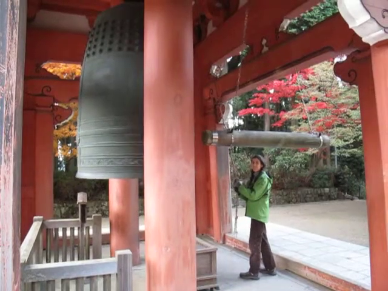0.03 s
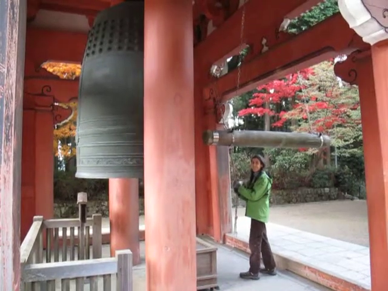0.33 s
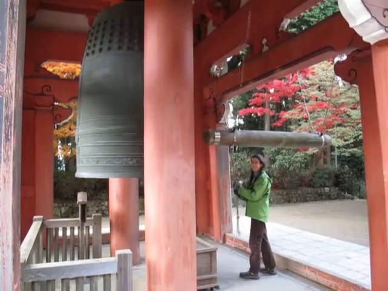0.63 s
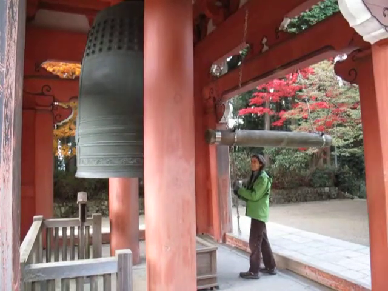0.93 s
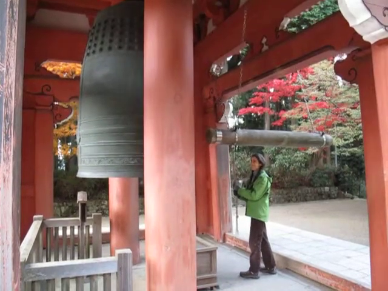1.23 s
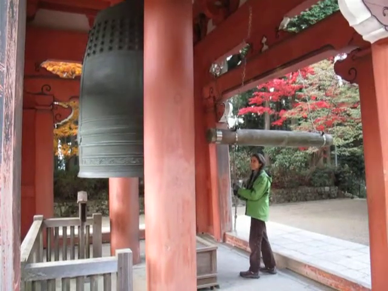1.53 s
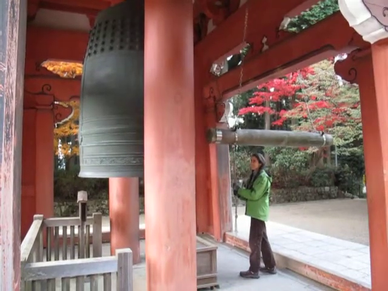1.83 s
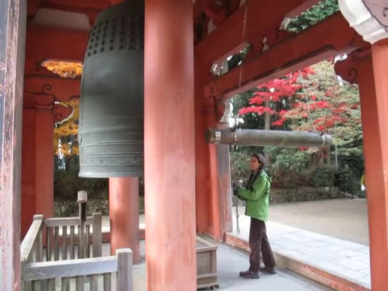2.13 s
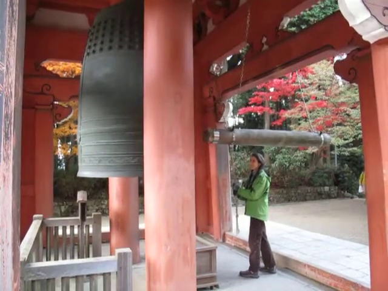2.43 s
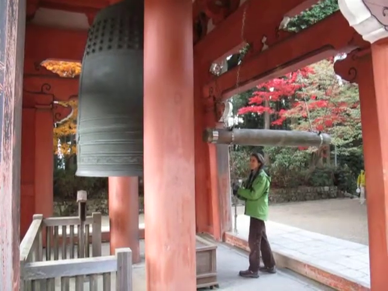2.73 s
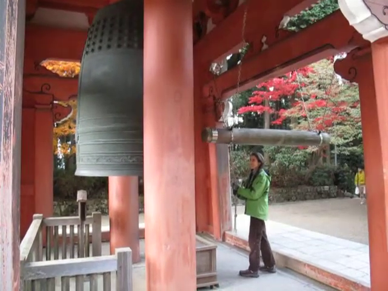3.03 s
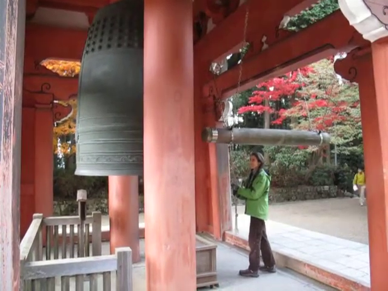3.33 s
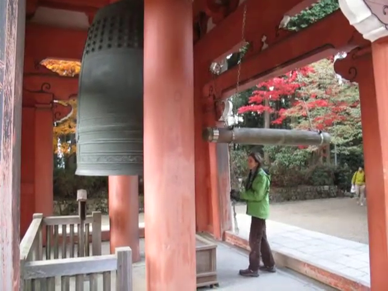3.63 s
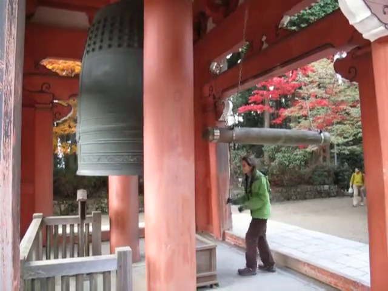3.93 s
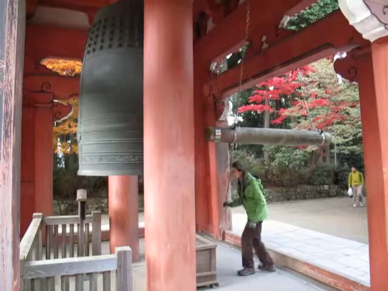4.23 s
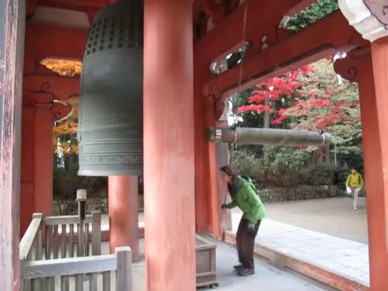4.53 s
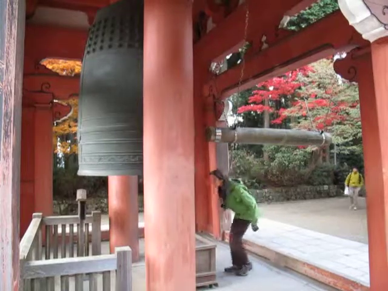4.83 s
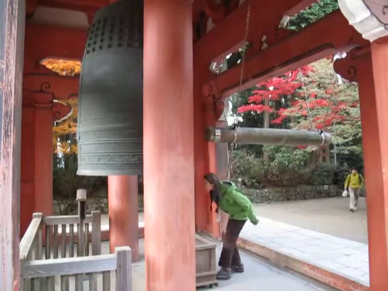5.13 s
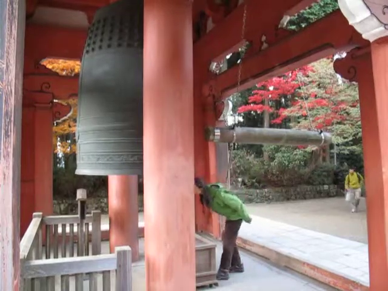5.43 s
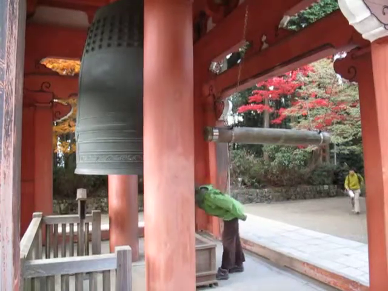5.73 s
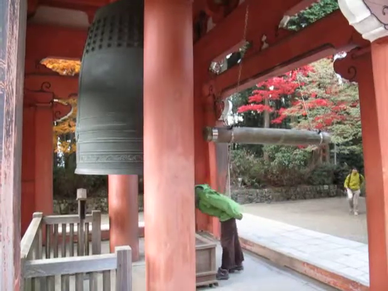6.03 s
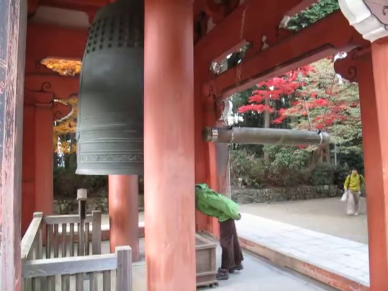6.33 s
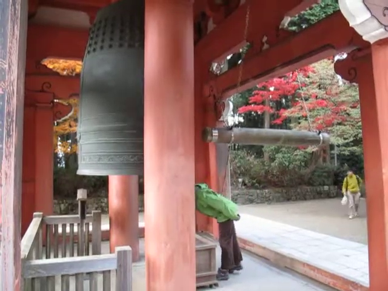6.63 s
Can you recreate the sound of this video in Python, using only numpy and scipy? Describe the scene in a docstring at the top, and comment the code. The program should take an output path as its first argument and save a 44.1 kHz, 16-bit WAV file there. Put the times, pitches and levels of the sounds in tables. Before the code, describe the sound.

A large temple bell hums on, low and slowly fading, over a distant passing car and faint jacket rustles and shoe scuffs.

```python
"""Temple bell ringing out

A great bronze bell, struck some time before, hums on in an open wooden pavilion, its paired modes
beating slowly. A broad rush, like a car on a far road, fades into the dull outdoor air. A visitor
bends down in a rustling jacket and shifts her feet on the gritty stone floor.
A small camera adds its own hiss and a thin whine."""
import sys
import numpy as np
from scipy import signal
from scipy.fft import rfft, irfft, next_fast_len
from scipy.io import wavfile
from scipy.ndimage import map_coordinates

SR = 44100
rng = np.random.default_rng(int(sys.argv[2]) if len(sys.argv) > 2 else 0)


def to_wav(s):
    """Save 16-bit WAV."""
    ch = np.atleast_2d(s).T  # columns
    pcm = np.round(np.clip(ch, -1, 1) * 32767)  # PCM
    wavfile.write(sys.argv[1], SR, pcm.astype(np.int16))


N = 303849
T = np.arange(N) / SR


def amp(db):
    """Decibels to gain."""
    return 10 ** (np.asarray(db) / 20)


def unit(x):
    """The signal scaled to rms 1."""
    return x / np.sqrt(np.mean(x ** 2) + 1e-20)


def wobble(rate):
    """A smooth random curve with `rate` knots a second."""
    knots = rng.standard_normal(int(N * rate / SR) + 4)
    return map_coordinates(knots, [T * rate])


def filtered(x, response):
    """The signal through an EQ whose gain is a function of frequency in Hz."""
    size = next_fast_len(N + 8192)
    hz = np.fft.rfftfreq(size, 1 / SR)
    return irfft(rfft(x, size) * response(hz), size)[:N]


def coloured(x, colour):
    """The signal shaped by (Hz, dB) points on a log frequency axis, at rms 1."""
    hz, db = np.transpose(sorted(colour))
    return unit(filtered(x, lambda f: amp(np.interp(np.log(f + 1), np.log(hz), db))))


def noise(colour):
    """Steady noise of a given colour, at rms 1."""
    return coloured(rng.standard_normal(N), colour)


def patchy(colour, depth_db, patch_hz, patch_s):
    """Noise of rms 1 whose narrow bands swell and sink, as sound does over many outdoor paths."""
    frames = dict(nperseg=4096, noverlap=3072)
    hz, t, spectrum = signal.stft(noise(colour), SR, **frames)
    knots = rng.standard_normal((1500, 200))
    grid = np.meshgrid(hz / patch_hz, t / patch_s, indexing="ij")
    patches = unit(map_coordinates(knots, grid, order=1, mode="mirror"))
    reach = 1 / (1 + (hz[:, None] / 2500) ** 2)  # the treble stays smooth
    _, sound = signal.istft(spectrum * amp(depth_db * reach * patches), SR, **frames)
    return unit(sound[:N])


def strokes(rows, rise_share):
    """The envelope of a series of strokes: each swells for a share of its length, then eases off."""
    power = np.zeros(N)
    for peak_s, length_s, db in rows:
        width_s = length_s * np.where(T < peak_s, rise_share, 1 - rise_share)
        power += amp(db) ** 2 * np.exp(-((T - peak_s) / width_s) ** 2)
    return np.sqrt(power)


def friction(envelope, colour, slips_per_s, smooth, catch_db):
    """Tiny random slips over a smooth rub, following the envelope and catching unevenly on the way."""
    slips = rng.standard_normal(N) * (rng.random(N) < slips_per_s / SR)
    rub = coloured(unit(slips) + smooth * rng.standard_normal(N), colour)
    return envelope * amp(catch_db * wobble(60)) * rub


def bell():
    """The casting is not quite round, so each mode splits into two close tones that beat as they die."""
    # The bell's modes. Each row: pitch in Hz, starting level in dB rms, decay in dB per second,
    # the weaker twin's offset in Hz, its relative amplitude, time of a beat's trough in seconds.
    modes = [(41.4, -58.5, 2.5, 1.3, 0.2, 0.61), (66.94, -40.5, 0.5, 0.111, 0.99, -0.38),
             (176.47, -29, 3, -0.014, 0.05, 2.9), (263.2, -51, 4, 1.23, 0.26, 1.83),
             (271.9, -53, 3.5, -0.836, 0.48, 1.36)]
    hum = np.zeros(N)
    for hz, db, decay, offset_hz, twin_share, trough_s in modes:
        beating = 1 - twin_share * np.exp(2j * np.pi * offset_hz * (T - trough_s))
        tone = np.exp(2j * np.pi * (hz * T + rng.random()))
        hum += np.sqrt(2) * amp(db - decay * T) * np.real(beating * tone)
    return hum


def car_roar(level_db=-49.5, waver_db=0.68, closest_s=1.43, pass_s=1.486):
    """A far car passes at steady speed, its low roar falling as 1 / distance."""
    # The roar's spectrum. Each row: frequency in Hz, relative level in dB.
    colour = [(20, -5), (110, -0.5), (370, -0.5), (500, -2.5), (750, -4), (1300, -6), (2300, -12.5),
              (4000, -24), (9000, -24), (15000, -56)]
    distance = np.hypot(1, (T - closest_s) / pass_s)  # 1 at the nearest point
    envelope = amp(level_db + waver_db * wobble(9)) / distance
    return envelope * patchy(colour, depth_db=2.0, patch_hz=60.0, patch_s=0.25)


def tyre_hiss(level_db=-44.0, waver_db=0.68, peak_s=0.21, turn_s=0.64, fade_db_per_s=6.5):
    """The tyres beam their hiss ahead, so it peaks before the car is nearest and dies before the roar."""
    # The tread's spectrum, strongest near 1 kHz. Each row: frequency in Hz, relative level in dB.
    colour = [(200, -22), (500, -6.5), (650, -5.5), (780, -3.5), (950, -1), (1170, -1.5), (1450, -6.5),
              (2300, -14), (3900, -21.5), (5200, -27), (7000, -25.5), (9200, -20.5), (11200, -32.5),
              (15500, -54)]
    past_s = np.hypot(T - peak_s, turn_s) - turn_s  # a rounded top, then a steady fade
    envelope = amp(level_db - fade_db_per_s * past_s + waver_db * wobble(12))
    return envelope * patchy(colour, depth_db=2.0, patch_hz=55.04, patch_s=0.1793)


def outdoor_air(level_db=-65, waver_db=3.0):
    """A dull, gently wavering bed of outdoor noise."""
    # The bed's spectrum. Each row: frequency in Hz, relative level in dB.
    colour = [(20, -6), (100, -5), (270, 2), (480, -10.5), (700, 4.5), (900, -2.5), (1300, 1.5),
              (1750, -7.5), (2500, -8.5), (5000, -21.5), (15000, -40)]
    envelope = amp(level_db + waver_db * wobble(3.95))
    return envelope * patchy(colour, depth_db=2.0, patch_hz=70.7, patch_s=0.298)


def jacket(stir_from_s=1.7, stir_db=-70.5, swing_db=2.2):
    """Nylon rubs in bright swishes and stirs faintly at random between them."""
    # The swishes. Each row: peak time in seconds, length in seconds, level in dB rms.
    swishes = [(2.54, 0.095, -61), (2.92, 0.14, -66), (3.77, .05, -65), (3.95, .08, -61.5),
               (4.28, 0.11, -58.5), (5.0, 0.26, -62.5), (5.48, 0.16, -61), (5.79, 0.027, -57.5),
               (5.85, 0.14, -64), (6.363, .02, -61.5), (6.412, .03, -62), (6.467, .016, -60),
               (6.795, 0.071, -58.5)]
    # The spectrum of rubbing nylon. Each row: frequency in Hz, relative level in dB.
    nylon = [(1500, -16), (3000, -6), (5000, -6.5), (7000, -3), (9300, 1), (10200, -1.5), (11200, -11),
             (12800, -16), (15500, -22)]
    stir = amp(stir_db + swing_db * wobble(6)) * (T > stir_from_s)
    envelope = np.hypot(strokes(swishes, rise_share=0.43), stir)
    return friction(envelope, nylon, slips_per_s=2200, smooth=1.2, catch_db=1.37)


def shoe_scuffs():
    """Soles scrape over the gritty stone floor."""
    # The scuffs. Each row: peak time in seconds, length in seconds, level in dB rms.
    scuffs = [(2.45, .035, -57), (4.955, 0.11, -57), (5.075, 0.12, -54), (6.8, .05, -72)]
    # The spectrum of scraping grit. Each row: frequency in Hz, relative level in dB.
    grit = [(300, -18), (750, -2), (1400, -2.5), (2500, -1.5), (3200, -4), (4200, -11), (10000, -17),
            (15000, -41)]
    return friction(strokes(scuffs, rise_share=0.47), grit, slips_per_s=1000, smooth=1.7, catch_db=0.9)


def grit_cracks(t60_s=0.028):
    """Grains of grit crack underfoot, each a sharp tick of noise."""
    # The cracks. Each row: start in seconds, level in dB.
    ticks = [(3.358, -51.5), (4.841, -47)]
    # A tick's spectrum. Each row: frequency in Hz, relative level in dB.
    colour = [(800, -18), (1800, -5), (2900, 5), (4900, -1), (6500, -9), (8500, -22), (15000, -40)]
    envelope = sum(amp(db - 60 * np.abs(T - start) / t60_s) * (T >= start) for start, db in ticks)
    return envelope * noise(colour)


def footfalls():
    """A sole comes down softly with a dull rub."""
    # The footfalls. Each row: peak time in seconds, length in seconds, level in dB rms.
    steps = [(5.795, 0.04, -55), (5.89, 0.12, -58.5)]
    # The sole's spectrum. Each row: frequency in Hz, relative level in dB.
    sole = [(150, 2), (450, -18), (720, 0), (1000, -6), (1700, -7), (3000, -17), (8000, -38)]
    return friction(strokes(steps, rise_share=0.36), sole, slips_per_s=1000, smooth=1.5, catch_db=1.5)


def scene():
    """Bell, car, air and visitor, mixed in mono."""
    surroundings = bell() + car_roar() + tyre_hiss() + outdoor_air()
    visitor = jacket() + shoe_scuffs() + grit_cracks() + footfalls()
    return (surroundings + visitor)[None]


def record(dry, hiss_db=-67.5, whine_hz=5880, whine_db=-70.5, whine_fade_db_per_s=0.4):
    """The camera adds hiss and a slowly fading whine, notches the treble and cuts off the very top."""
    # The camera's hiss. Each row: frequency in Hz, relative level in dB.
    hiss_colour = [(1000, -0.5), (3000, -1), (5000, -1), (7000, -3), (9300, -1), (10200, -1), (11200, -10),
                   (12800, -10.5), (15500, -14)]
    notch_hz, notch_width_hz, notch_depth, top_hz = 11830, 600, 0.89, 15700

    def response(hz):
        notch = 1 - notch_depth * np.exp(-((hz - notch_hz) / notch_width_hz) ** 2)
        return notch * (hz < top_hz)

    hiss = amp(hiss_db) * noise(hiss_colour)
    whine = np.sqrt(2) * amp(whine_db - whine_fade_db_per_s * T) * np.sin(2 * np.pi * whine_hz * T)
    return filtered(dry[0] + hiss + whine, response)[None]


dry = scene()
out = record(dry)
to_wav(out)
```